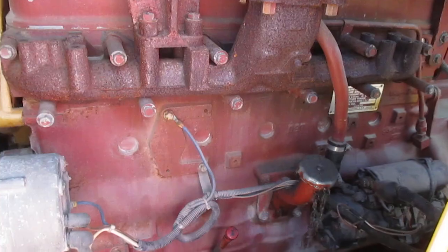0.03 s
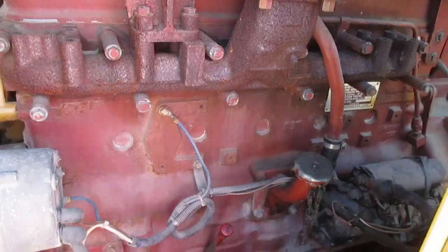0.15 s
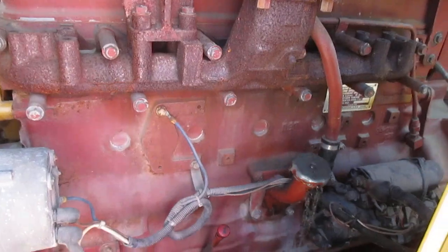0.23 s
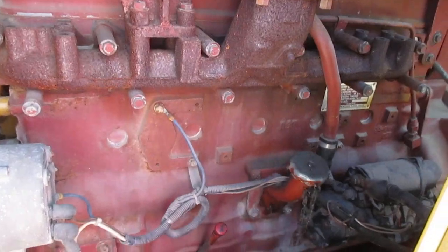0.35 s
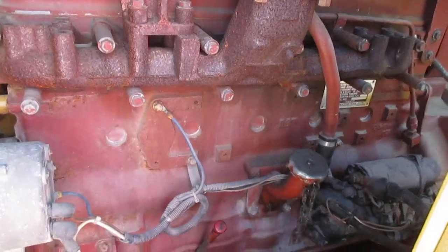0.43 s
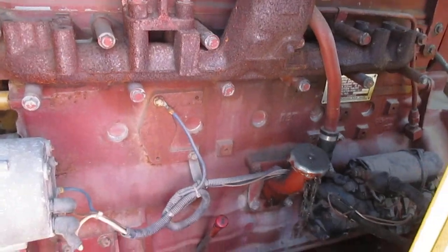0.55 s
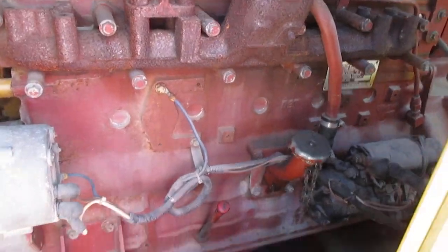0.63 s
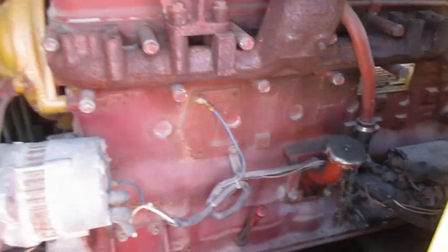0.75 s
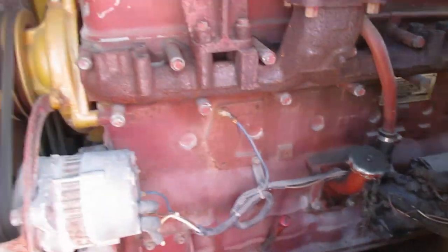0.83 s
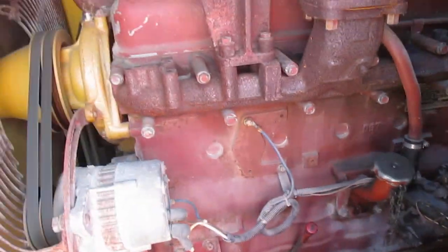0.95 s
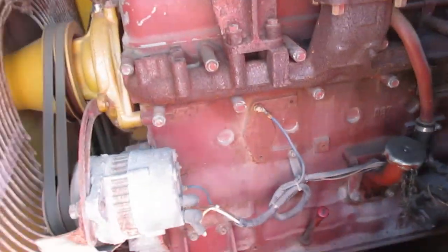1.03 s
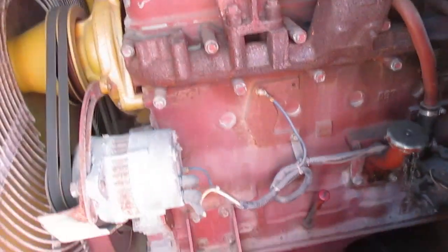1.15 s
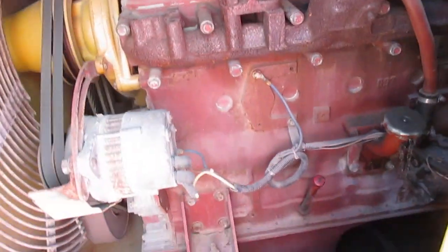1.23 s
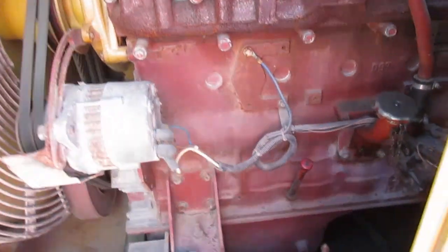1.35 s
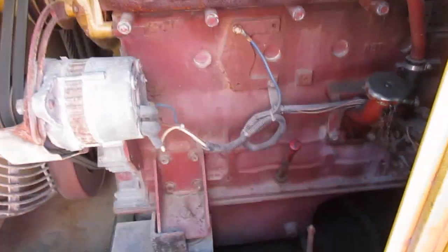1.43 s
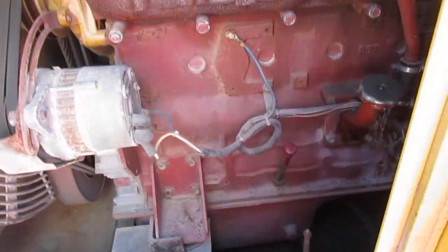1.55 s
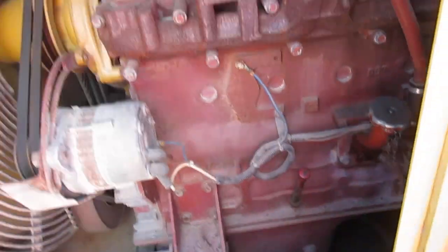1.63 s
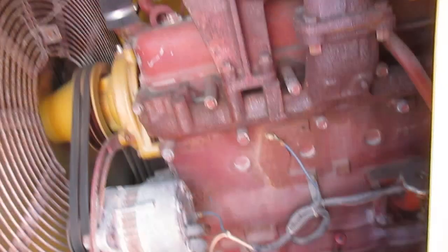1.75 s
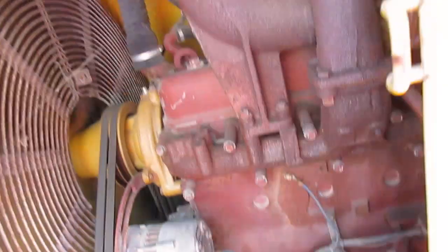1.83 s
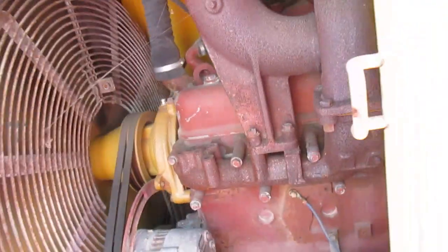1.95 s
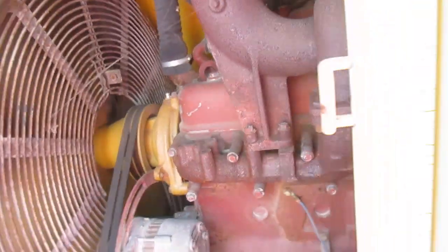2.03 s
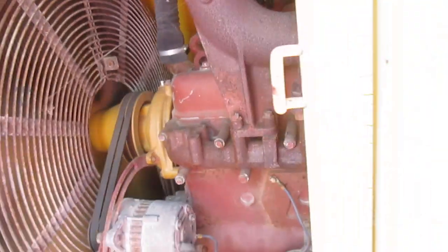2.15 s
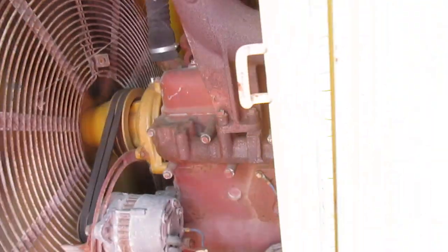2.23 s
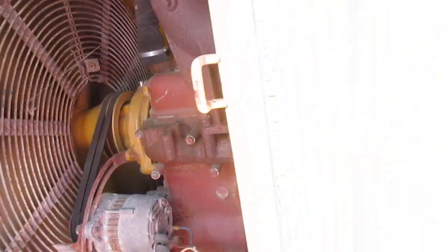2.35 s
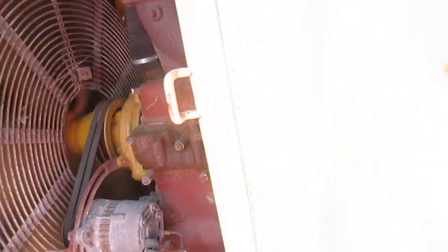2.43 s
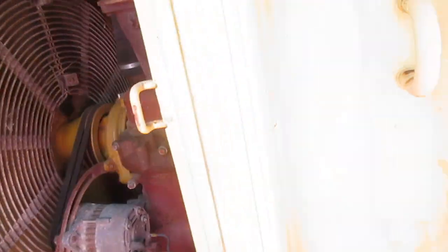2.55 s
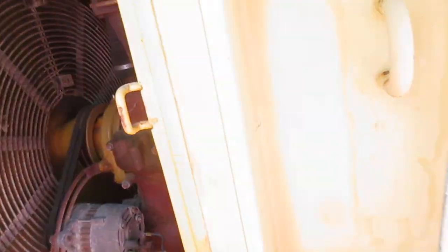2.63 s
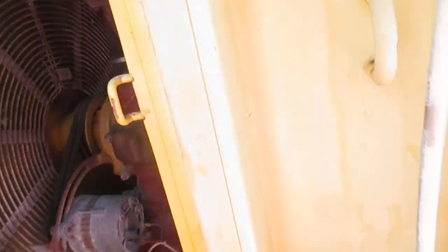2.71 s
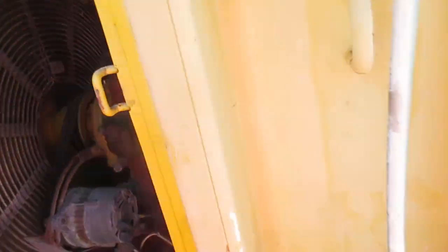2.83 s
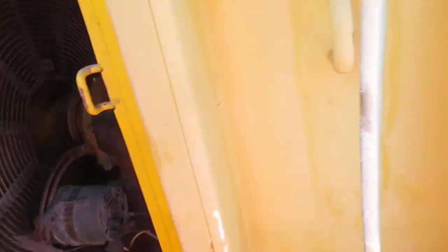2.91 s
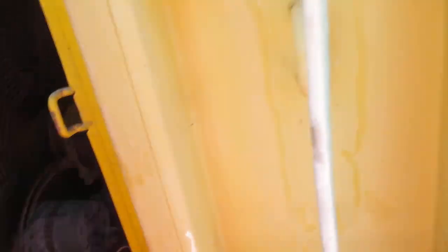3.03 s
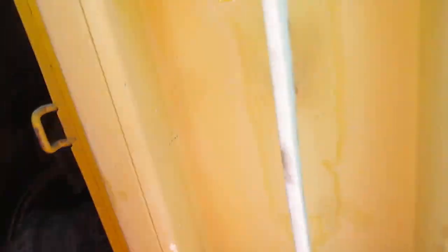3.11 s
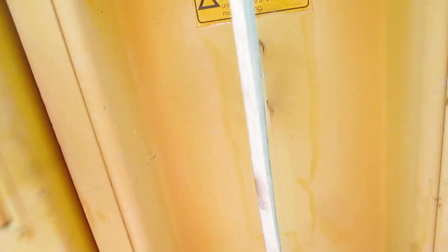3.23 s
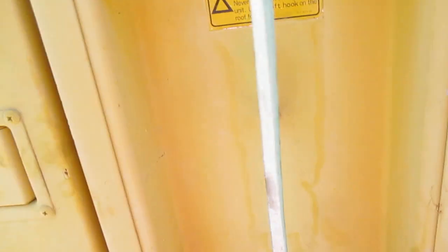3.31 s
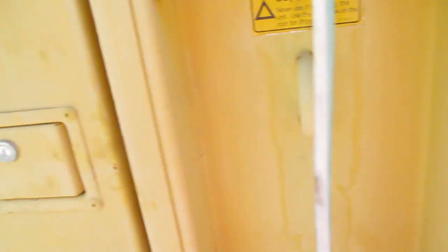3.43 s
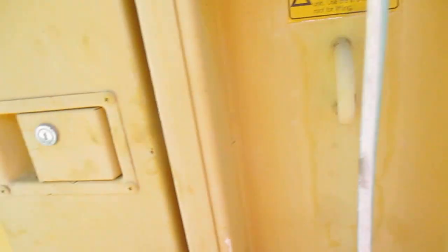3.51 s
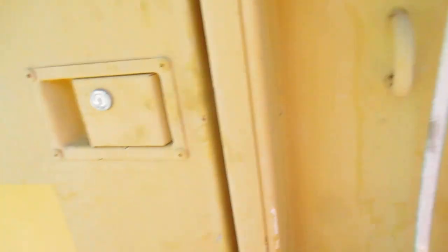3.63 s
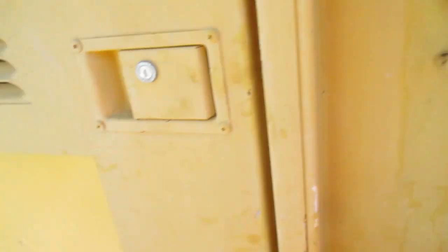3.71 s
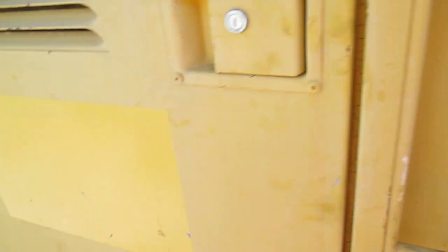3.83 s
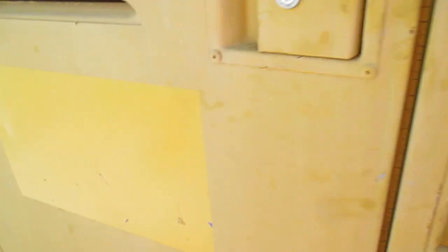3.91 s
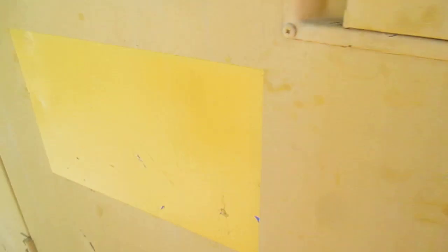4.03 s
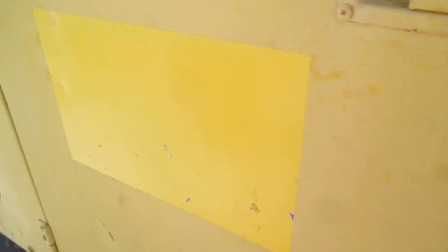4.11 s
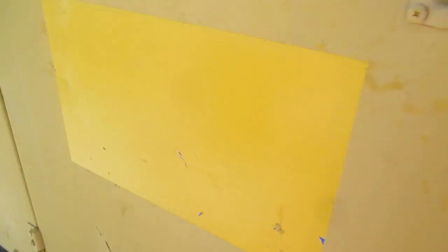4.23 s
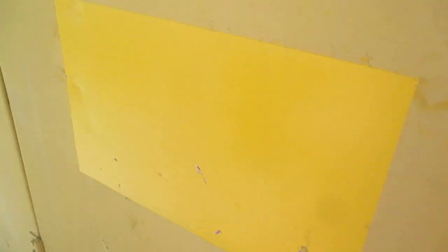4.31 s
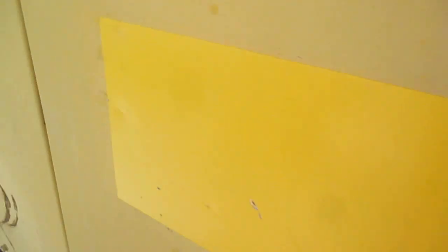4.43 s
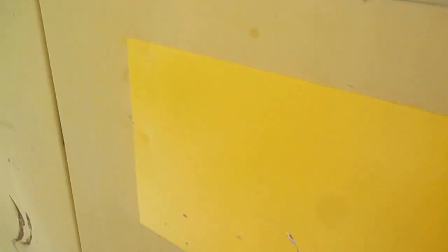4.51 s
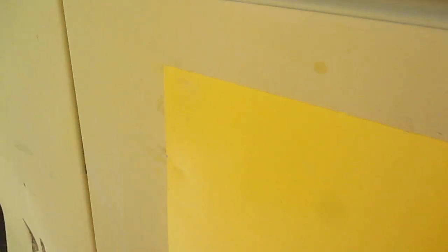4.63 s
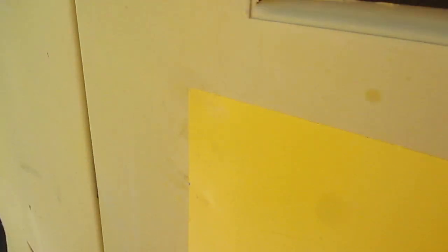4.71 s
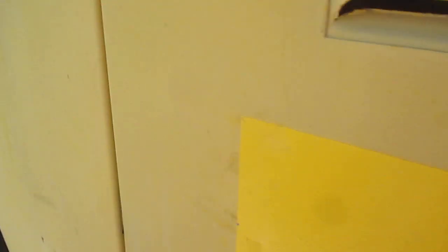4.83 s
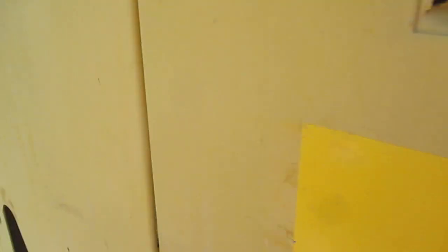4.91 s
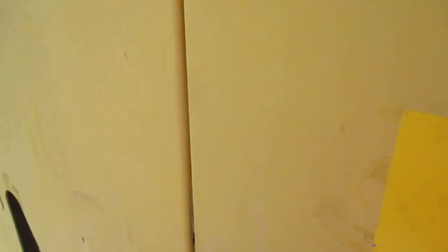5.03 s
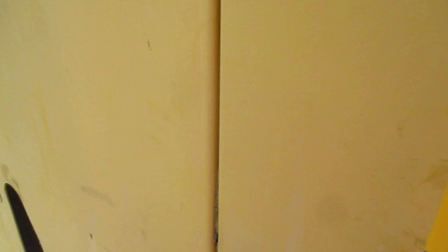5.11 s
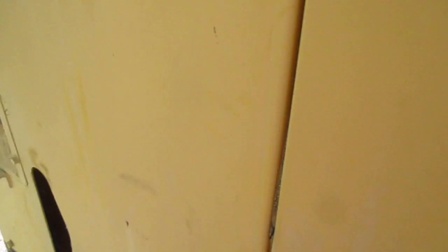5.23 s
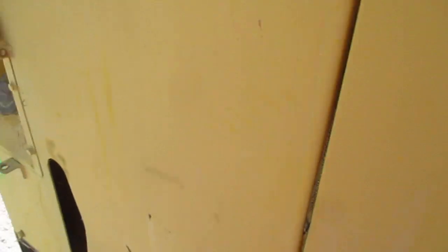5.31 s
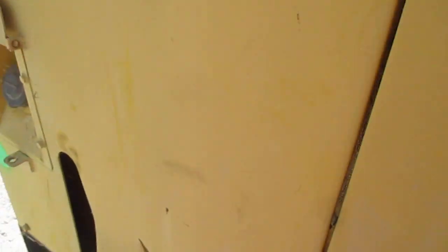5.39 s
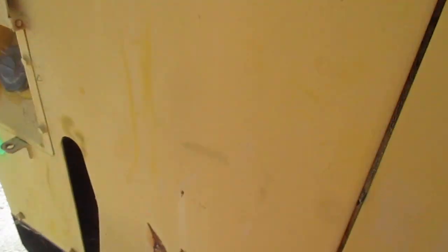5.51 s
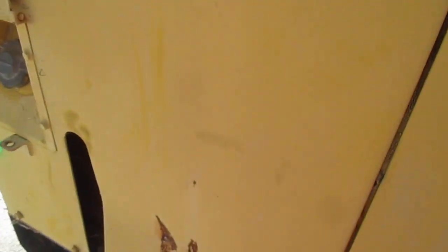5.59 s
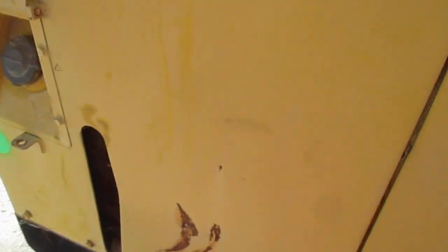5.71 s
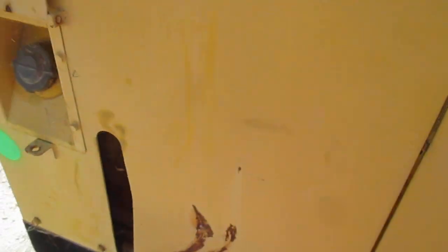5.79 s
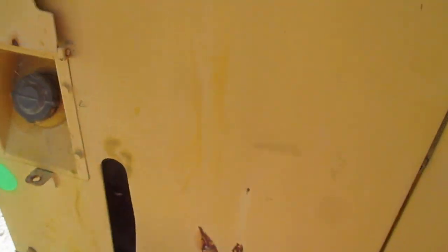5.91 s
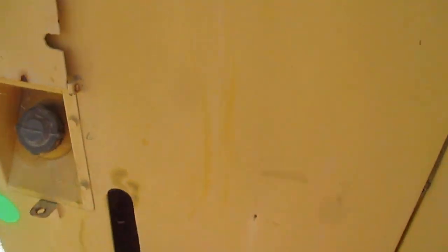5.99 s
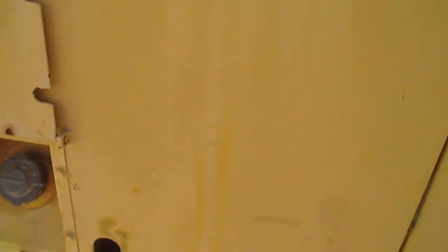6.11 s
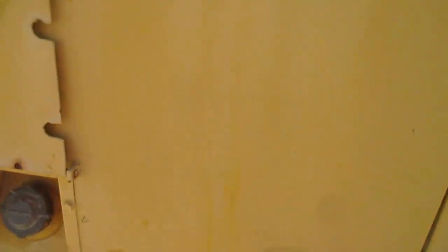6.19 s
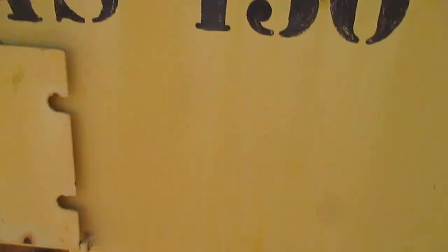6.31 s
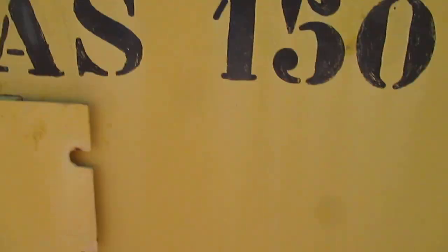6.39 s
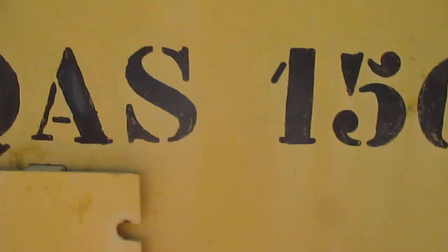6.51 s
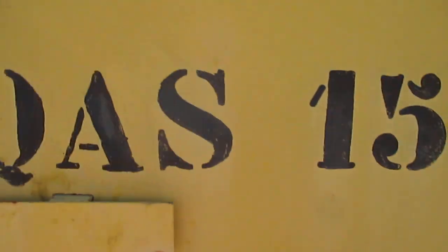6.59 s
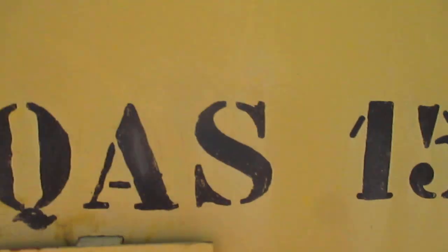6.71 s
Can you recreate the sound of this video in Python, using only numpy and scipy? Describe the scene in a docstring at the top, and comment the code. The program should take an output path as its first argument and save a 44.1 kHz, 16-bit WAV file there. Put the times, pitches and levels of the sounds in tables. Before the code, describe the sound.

Close to an open housing, a six-cylinder diesel engine runs steadily with rough throbbing, clatter and fan hum. The metal door is bumped, then swings shut with a bang and rattling latch. The engine instantly turns muffled, and its low drone swells again as the microphone moves along the housing outdoors, with faint trills nearby.

```python
"""First heard is the steady throb of a six-cylinder diesel generator and its fan, at the open housing door.
Firing-modulated noise, filtered by block and door, makes the engine; harmonic series make exhaust and fan.
The air gap rings as narrow noise. The nudged door swings to, bangs and chatters: noise cracks and dying modes.
Muffled engine and fan then grow again, bass first, as the microphone moves along the housing.
A squeak of the hinge and faint trills nearby are narrow-band noise."""
import sys
import numpy as np
from scipy import signal
from scipy.fft import rfft, irfft
from scipy.io import wavfile
from scipy.ndimage import uniform_filter1d

SR = 44100
rng = np.random.default_rng(int(sys.argv[2]) if len(sys.argv) > 2 else 0)


def dump(signal):
    """Clip the signal to [-1, 1] and save it as 16-bit WAV at the path in sys.argv[1]."""
    limited = np.clip(np.atleast_2d(signal).T, -1, 1)
    pcm = np.round(limited * 32767).astype(np.int16)
    wavfile.write(sys.argv[1], SR, pcm)


N = 297675
T = np.arange(N) / SR  # time/s

CYCLE_SAMPLES = 4012  # two crank turns, six firings
FIRST_FIRING_S = .0908
EXHAUST_START_RAD, FAN_START_RAD = -1.35, -.38
VALVE_HZ, VALVE_WIDTH_HZ, VALVE_T60_S = 9580, 1050, 0.11
VALVE_OVER_FIZZ_DB = 3.5  # peak of the tick over the top noise layer, door open
WAVER_DB_PER_MULTIPLE = .1  # rms wavering of a tone, times its multiple
CRACK_T60_S, SHORTER_S_PER_DB = .075, .0004  # weaker cracks die sooner
LATCH_OVER_CRACK_DB = -16.5  # for single blows
RUN_JITTER_S, RUN_SPREAD_DB = .002, 4  # greatest deviation either way
TRILL_PER_S = 48
BAND_LIMIT_HZ = 15780

# What reaches the microphone as it moves and the door shuts:
# [t/s, bass level/dB, body level/dB, treble level/dB]
HEARD = [(0.0, -1, 1.5, 0.5), (0.7, 0, 0.4, 1.2), (1.14, 1.5, 0, 0.7), (1.35, 0.5, -1.5, -1.6),
         (1.65, 0, -0.4, 1), (2.0, -0.5, -0.5, -1.5), (2.63, 0, -1, -3), (2.97, 0.7, -4, -4.5),
         (3.21, -1, -8, -9.5), (3.44, -8, -12, -13.5), (3.61, -9.5, -17, -21), (3.91, -9.5, -17, -21.5),
         (4.63, -6, -12.5, -19), (4.92, -3.5, -10, -19), (5.36, -1.5, -9.5, -20), (6.13, 3.5, -8, -19),
         (6.75, 7.5, -4.5, -16.5)]
# Narrowing of the door gap, which lifts or lowers layers: [t/s, share 0-1]
GAP_NARROWING = [(1.3, 0), (2.4, .5), (2.95, .95), (3.2, 1), (3.34, 0)]
# Change from the open-door to the shut-door spectrum: (start t/s, end t/s)
SHUTTING_S = (2.97, 3.196)

# Engine noise bands: [low f/Hz, high f/Hz, power share repeating each cycle, throb depth/dB]
NOISE_BANDS = [(20, 113, 0.19, -5), (150.5, 275, 0.25, 0.5), (377, 1310, 0.66, 1), (1490, 2790, 0.38, 2.5),
               (3420, 6680, 0.28, 2), (8540, 13700, .08, 4.5)]
# The same bands as rumble, growl, roar, clatter, hiss, fizz:
# [level/dB, share of bass level, of body level, of treble level, lift/dB by the narrowing gap]
NOISE_LEVELS = [(-32, .8, 0, 0, -4), (-27.5, 0.42, .05, 0.0055, 2.5), (-19.2, 0, 1.06, 0, -2.6),
                (-25, 0, 0.48, 0.49, 1.6), (-33, 0.056, 0, 1, 0.5), (-41.5, 0, 0.053, 1.17, 1)]
# Loud and dead spots of the noise: [band counted from 0, t/s, half-width/s, level/dB]
NOISE_SPOTS = [(0, 1.3, .3, 1.5), (1, 1.9, .35, -3), (1, 6.2, .6, -2.2), (4, 4.6, .45, -1.8),
               (5, 4.8, .35, 1.5), (5, 6.3, .5, -1.5)]
# Strength of the six firings in order: [relative; a quarter of it is added to the throb]
FIRING_STRENGTHS = [2.1, 0.56, 3.8, 1.6, 2.5, 2.7]
# Engine spectra with the door open and shut: [f/Hz, level per Hz/dB]
OPEN_SPECTRUM = [(20, -13), (60, -4), (110, 5), (170, -0.5), (250, -6.5), (420, 0), (668, -3), (1310, -7),
                 (1500, -13.5), (3050, -17), (3500, -23), (6500, -33), (11000, -43.5), (15600, -50)]
SHUT_SPECTRUM = [(20, -19), (50, -15), (82, -10.5), (120, -2), (260, 0), (480, -8.5), (620, -15),
                 (1250, -21), (1580, -30.5), (2900, -37.5), (3550, -45.5), (6500, -54.5), (11000, -64),
                 (15600, -70)]
# Resonances of block and housing: [f/Hz, width/Hz, peak lift open/dB, peak lift shut/dB]
BLOCK_RESONANCES = [(156.8, 3.5, -2.5, 10.5), (464, 16, 0, 1), (504, 12, 4, 0.5), (578, 9.7, 5, 0.5),
                    (665.6, 17, 8.5, -5.5), (784, 12, 4, 4), (1159, 12, 4.5, 10), (1948, 19, 6.5, 10.5),
                    (2276, 43, 4, 1), (2870, 14, 8.5, 1)]

# Exhaust tones on the firing rate, fan tones on the blade rate:
# [multiple, level/dB, share of bass level, of body level, of treble level, lift/dB by the narrowing gap]
EXHAUST_TONES = [(1, -25, 0.95, 0, 0, 0.5), (2, -27, 0.087, 0.86, 0, 3), (3, -31, 0.026, .6, 0, 7),
                 (4, -41, 0, 0.035, 0, 12)]
FAN_TONES = [(1, -27, 0.93, 0, 0, -4), (2, -24, 0.28, 0.58, 0.041, 7.5), (3, -38, 0.024, .5, 0, 19.5),
             (4, -30.5, 0, 1.55, 0.043, 8), (10, -32.5, 0, 0.98, 0.045, 6.5), (20, -39, 0.08, 0.02, .95, 6)]
# Loud and dead spots the microphone passes: [multiple, t/s, half-width/s, level/dB]
EXHAUST_SPOTS = [(2, .8, .5, 2.5), (2, 3.5, .3, -5), (2, 5.7, .75, 8), (3, 3.45, .2, -6), (3, 5.2, 1.1, 7),
                 (3, 6.2, .25, -5), (3, 6.75, .12, 5), (4, 1.2, .4, -14), (4, 5.6, 1.3, 4)]
FAN_SPOTS = [(1, 1.6, 1.2, -20), (1, 3.8, .3, 3), (1, 4.55, .65, 7), (1, 6.0, .35, -4), (2, .3, 0.46, -3),
             (2, 2.2, .2, -7), (2, 3.55, .35, -6), (2, 4.7, .4, 3), (2, 5.65, .45, -15), (3, 0.0, .45, -8),
             (3, 3.7, .3, 5), (3, 5.0, .2, 10.5), (3, 5.9, 0.84, -8), (4, 2.3, .35, -5), (4, 4.3, .45, -10),
             (4, 2.85, .15, -14), (4, 5.55, .5, 10), (10, 2.0, .4, -5), (10, 5.0, .15, -15),
             (10, 6.3, .4, -4), (20, 1.5, 0.21, 7.5), (20, 1.95, .2, -5), (20, 4.85, .5, 10.5)]
# Blade rate of the fan, whose belt slips a little for a moment: [t/s, f/Hz]
FAN_RATE = [(0, 96.75), (1.4, 96.75), (1.85, 96.45), (2.3, 96.75), (6.75, 96.74)]
# Ringing of the air gap until the door is to: [t/s, f/Hz, level/dB]
GAP_RING = [(1.5, 640, -33), (1.8, 640, -23), (2.1, 688.5, -21.5), (2.4, 690.4, -26.5), (2.7, 677.6, -24),
            (3.1, 669, -28), (3.3, 673, -35)]

# Single blows of the door: [t/s, crack envelope level/dB, edge ring level/dB before roughening]
SINGLE_BLOWS = [(1.0934, -11, -33), (3.2624, -10.5, -27), (3.2758, -14.5, -21.5), (3.279, -10.5, -18),
                (3.2854, -27, -21), (3.2974, -21, -30), (3.3094, -24, -34), (3.322, -21, -25),
                (3.33, -18, -21.5), (3.345, -24, -33), (3.3543, -31, -36), (3.373, -44, -36),
                (3.4144, -42, -49), (3.454, -34, -44), (3.4824, -31, -45), (3.615, -44, -50),
                (3.6374, -37, -51), (3.6681, -38, -49)]
# Runs of blows as the door rebounds and the latch rattles out: [first t/s, last t/s, spacing/s,
# first crack level/dB, loss per blow/dB, edge ring over crack/dB, latch ring over crack/dB]
BLOW_RUNS = [(3.3885, 3.65, .051, -26.5, 1.6, -12, -14), (3.7054, 3.92, .0305, -44, 0, -5, -9)]
# Spectrum of a crack: [f/Hz, level per Hz/dB]
CRACK_SPECTRUM = [(250, -19), (500, -11.5), (1000, -4.5), (2200, -7), (3200, -15), (6000, -17),
                  (9000, -19.5), (12500, -27.5), (15600, -40)]
# Thumps of the door on the housing: [t/s, boom level/dB, drum level/dB]
THUMPS = [(1.097, -10.5, -34), (1.125, -12, -39), (1.159, -15, -30), (1.216, -21, -34), (1.28, -21.5, -36),
          (3.27, -25, -15), (3.287, -14.5, -18), (3.31, -33, -13), (3.328, -17.5, -22), (3.348, -34, -13.5),
          (3.39, -28, -14), (3.445, -22, -23), (3.541, -30, -27), (3.58, -35, -24)]
# Modes of door edge, latch, door panel and booming housing: [f/Hz, relative level/dB, t60/s]
EDGE_MODES = [(780, -8, .1), (960, -6, .1), (1120, -4, .1), (1335, 0, .11), (1440, -4, .1), (1700, -7, .1),
              (2080, -2.5, .12), (2230, -5, .1), (2480, -6, .1)]
LATCH_MODES = [(3130, 5.5, 0.11), (3600, -2.5, .1), (4700, 2, 0.13), (6000, -1, .08), (6040, -3, .09),
               (7240, -7, .12), (7450, -17, 0.074), (9200, -11, .1), (9300, -7, .1)]
PANEL_MODES = [(185, -4, .2), (268, 0, .2), (300, -2.5, .2), (335, -3, .18), (480, -8, .15), (690, -9, .15)]
HOUSING_MODES = [(47, -6, 0.55), (58.4, -4, .5), (75, 2, 0.25), (94, -3, .15), (150.2, 0, 0.37)]
# Faint squeaks of the hinge: [start t/s, end t/s, start f/Hz, end f/Hz, level/dB]
SQUEAKS = [(3.07, 3.152, 10900, 11800, -50), (3.2, 3.235, 12000, 12200, -66)]
# Faint trills nearby: [start t/s, end t/s, f/Hz, level/dB before pulsing]
TRILLS = [(4.21, 4.33, 4130, -62), (4.56, 4.62, 4150, -65), (4.85, 4.95, 3850, -60),
          (4.99, 5.08, 4050, -61), (5.14, 5.17, 4200, -61), (5.387, 5.46, 4150, -57),
          (5.54, 5.71, 4170, -54), (5.74, 5.81, 4130, -59), (6.21, 6.35, 4130, -59), (6.4, 6.45, 4120, -59),
          (6.66, 6.7, 4150, -60)]
# Brief dips of the treble: [t/s, length/s, level/dB]
TREBLE_DIPS = [(1.122, .003, -8), (1.166, .003, -18), (3.2955, .006, -22), (3.339, .004, -10)]


def gain_of(db):
    """Amplitude ratio from a level: twenty decibels per factor of ten."""
    return 10 ** (np.asarray(db) / 20)


def evened(x):
    """Normalization to a root-mean-square value of 1."""
    return x / np.sqrt(np.mean(x ** 2) + 1e-20)


def columns(rows):
    """Linear interpolation of each column against the time in the first."""
    times, *values = np.transpose(rows)
    return [np.interp(T, times, value) for value in values]


def read(points, hz):
    """Interpolation of a spectrum on a logarithmic frequency axis."""
    f, value = np.transpose(points)
    return np.interp(np.log(hz + 1), np.log(f + 1), value)


def shaped(x, gain):
    """Linear filtering: each spectral bin is multiplied by its gain, then the whole is set to rms 1."""
    return evened(irfft(rfft(x) * gain, N))


def wobble(size):
    """Random fluctuation of rms 1: white noise under two moving averages of size samples."""
    once = uniform_filter1d(rng.standard_normal(N), size)
    return evened(uniform_filter1d(once, size))


def fuzzy(hz, width):
    """Narrow-band noise: complex low-passed noise shifted onto a carrier that follows hz."""
    radius = np.exp(-np.pi * width / SR)
    white = rng.standard_normal(N) + 1j * rng.standard_normal(N)
    slow = signal.lfilter([1], [1, -2 * radius, radius * radius], white)
    phase = 2 * np.pi * np.cumsum(hz * np.ones(N)) / SR
    return evened((slow * np.exp(1j * phase)).real)


def controls():
    """Transmission by position and aperture: three heard levels and the narrowing of the gap."""
    return np.array(columns(HEARD) + columns(GAP_NARROWING))


def level(law, spots, which, control):
    """Superposition in dB: own level, weighted controls and Gaussian loud or dead spots."""
    spot_db = sum(db * np.exp(-((T - s) / half) ** 2)
                  for target, s, half, db in spots if round(target) == which)
    return law[0] + np.dot(law[1:], control) + spot_db


def repeating(memory):
    """Cyclic correlation: each cycle of noise keeps most of the cycle before it."""
    fresh = rng.standard_normal((N // CYCLE_SAMPLES + 21, CYCLE_SAMPLES))
    cycles = signal.lfilter([1], [1, -memory], fresh, axis=0)
    return evened(cycles[20:].ravel()[:N])  # the first cycles settle the memory


def engine_colours(hz):
    """Resonance: Lorentzian peaks of block and housing lift the open and shut spectra."""
    def lift(column):
        return sum(row[column] / (1 + (2 * (hz - row[0]) / row[1]) ** 2) for row in BLOCK_RESONANCES)
    return gain_of(read(OPEN_SPECTRUM, hz) + lift(2)), gain_of(read(SHUT_SPECTRUM, hz) + lift(3))


def valve(firings, fizz_db, shut):
    """Exponential decay: one valve tick per cycle, a noise resonance restarted at the fourth firing."""
    since_s = (firings - 3) % 6 * CYCLE_SAMPLES / 6 / SR
    db = fizz_db + VALVE_OVER_FIZZ_DB + 2.0 * np.sin(shut) - 60 * since_s / VALVE_T60_S
    return gain_of(db) * fuzzy(VALVE_HZ, VALVE_WIDTH_HZ)


def engine():
    """Amplitude modulation: firings throb repeating and fresh noise, coloured by block and door."""
    hz = np.fft.rfftfreq(N, 1 / SR)
    open_colour, shut_colour = engine_colours(hz)
    shut = np.interp(T, SHUTTING_S, (0, np.pi / 2))  # angle of an equal-power crossfade
    firings = (T - FIRST_FIRING_S) * SR / CYCLE_SAMPLES * 6
    strength = np.array(FIRING_STRENGTHS)[np.floor(firings).astype(int) % 6] / 4
    throb = uniform_filter1d(.5 - firings % 1 + strength, size=30)  # jumps at each firing, then sinks
    same, fresh = repeating(memory=0.891), rng.standard_normal(N)
    control = controls()
    levels = [level(law, NOISE_SPOTS, k, control) for k, law in enumerate(NOISE_LEVELS)]
    out = np.zeros(N)
    for (low_hz, high_hz, share, throb_db), db in zip(NOISE_BANDS, levels):
        uneven_db = 1.08 * wobble(size=300) + 0.76 * wobble(size=4000)  # no two firings burn alike
        noise = np.sqrt(share) * same + np.sqrt(1 - share) * fresh
        drive = gain_of(throb_db * throb + uneven_db) * noise
        band = 1 / np.sqrt((1 + (low_hz / (hz + 1)) ** 12) * (1 + (hz / high_hz) ** 12))
        through_open = np.cos(shut) * shaped(drive, band * open_colour)
        through_shut = np.sin(shut) * shaped(drive, band * shut_colour)
        out += gain_of(db) * (through_open + through_shut)
    return out + valve(firings, levels[-1], shut)


def tones(rows, spots, hz, start_rad):
    """Harmonic series: multiples of one rotation swell and fade at loud and dead spots."""
    angle = 2 * np.pi * np.cumsum(hz * np.ones(N)) / SR + start_rad
    control, out = controls(), np.zeros(N)
    for multiple, *law in rows:
        waver_db = multiple * WAVER_DB_PER_MULTIPLE * wobble(size=3000)
        db = level(law, spots, round(multiple), control) + waver_db
        out += np.sqrt(2) * gain_of(db) * np.cos(round(multiple) * angle)
    return out


def exhaust():
    """Periodic pulsation: tones on multiples of the firing rate, six firings per cycle."""
    return tones(EXHAUST_TONES, EXHAUST_SPOTS, 6 * SR / CYCLE_SAMPLES, EXHAUST_START_RAD)


def fan():
    """Blade-passing tones: multiples of a blade rate that sags slightly as the belt slips."""
    return tones(FAN_TONES, FAN_SPOTS, columns(FAN_RATE)[0], FAN_START_RAD)


def door_gap():
    """Cavity resonance: the air gap sounds as narrow noise of moving pitch until the door is to."""
    gap_hz, gap_db = columns(GAP_RING)
    return gain_of(gap_db) * (T < GAP_RING[-1][0]) * fuzzy(gap_hz, width=138)


def add(mix, s, sound):
    """Superposition: a sound is added into the mix from time s, cut at the end."""
    part = mix[round(s * SR):][:len(sound)]
    part += sound[:len(part)]


def ring(modes, t, chance, uneven_db):
    """Modal decay: damped sines whose pitch and level vary a little with each stroke."""
    out = np.zeros(len(t))
    for (hz, db, t60), c in zip(modes, chance):
        struck_hz = hz * (1 + 0.033 * (c - .5))
        decay_db = db + uneven_db * (c - 1.0) - 60 * t / t60
        out += gain_of(decay_db) * np.sin(2 * np.pi * struck_hz * t)
    return out


def blows():
    """Repeated impact: single blows, then runs with random timing and strength."""
    rows = [(s, db, edge_db, db + LATCH_OVER_CRACK_DB) for s, db, edge_db in SINGLE_BLOWS]
    for first, last, spacing, db, loss_db, edge_db, latch_db in BLOW_RUNS:
        luck = rng.uniform(-1, 1, (12, 2))
        for k, s in enumerate(np.arange(first, last, spacing)[:len(luck)]):
            crack_db = db - k * loss_db + RUN_SPREAD_DB * luck[k, 0]
            time_s = s + RUN_JITTER_S * luck[k, 1]
            rows.append((time_s, crack_db, crack_db + edge_db, crack_db + latch_db))
    return rows


def door():
    """Impact excitation: blows crack and ring edge and latch; thumps drum the panel and boom the housing."""
    hz = np.fft.rfftfreq(N, 1 / SR)
    crack = shaped(rng.standard_normal(N), gain_of(read(CRACK_SPECTRUM, hz)))
    crack_envelope, edge, bodies = np.zeros(N), np.zeros(N), np.zeros(N)
    t = T[:SR // 2]
    for s, db, edge_db, latch_db in blows():
        chance = rng.random(len(LATCH_MODES))
        t60 = max(CRACK_T60_S + SHORTER_S_PER_DB * db, .01)
        add(crack_envelope, s, gain_of(db - 60 * t / t60) * np.minimum(t / 0.0011, 1))
        add(edge, s, gain_of(edge_db) * ring(EDGE_MODES, t, chance, uneven_db=2))
        add(bodies, s, gain_of(latch_db) * ring(LATCH_MODES, t, chance[::-1], uneven_db=14))
    for s, boom_db, drum_db in THUMPS:
        chance = rng.random(len(PANEL_MODES))
        drum = ring(PANEL_MODES, t, chance, uneven_db=1.5) * np.minimum(t / 0.0049, 1)
        boom = ring(HOUSING_MODES, t, chance, uneven_db=3.0) * np.minimum(t / 0.0073, 1)
        add(bodies, s, gain_of(drum_db) * drum)
        add(bodies, s, gain_of(boom_db) * boom)
    buzz = .7 + .7 * wobble(size=120)  # loose sheet metal roughens the ring of the edge
    return bodies + edge * buzz + crack_envelope * crack


def bursts(rows, width):
    """Enveloped narrow-band noise: fuzzy tones swell, fade and glide from pitch to pitch."""
    out = np.zeros(N)
    for start, end, start_hz, end_hz, db in rows:
        progress = np.clip((T - start) / (end - start), 0, 1)
        swell = np.sqrt(np.sin(np.pi * progress).clip(0))
        glide_hz = np.interp(T, (start, end), (start_hz, end_hz))
        out += gain_of(db) * swell * fuzzy(glide_hz, width)
    return out


def hinge():
    """Friction squeak, modelled as narrow-band noise with rising pitch."""
    return bursts(SQUEAKS, width=150)


def trills():
    """Amplitude modulation: a cosine makes quick pulses of a narrow tone."""
    pulses = 1 + 0.65 * np.cos(2 * np.pi * TRILL_PER_S * T)
    steady = [(start, end, hz, hz, db) for start, end, hz, db in TRILLS]
    return pulses * bursts(steady, width=60)


def scene():
    """Linear superposition of all sources in one channel."""
    return (engine() + exhaust() + fan() + door_gap() + door() + hinge() + trills())[None]


def record(dry):
    """Filtering and saturation: brief treble dips, soft limit, short end fade, then band limit."""
    low = signal.sosfiltfilt(signal.butter(2, 500, fs=SR, output="sos"), dry)
    dip_db = sum(db * np.exp(-(2 * (T - s) / length) ** 4) for s, length, db in TREBLE_DIPS)
    dipped = low + gain_of(dip_db) * (dry - low)
    limited = 1.1 * np.tanh(dipped / 1.1)
    faded = limited * np.minimum((T[-1] - T) / .003, 1)
    padded = np.pad(faded, ((0, 0), (511, 511)), "reflect")
    low_pass = signal.firwin(1023, BAND_LIMIT_HZ, window=("kaiser", 9), fs=SR)
    return signal.oaconvolve(padded, low_pass[None], "valid")


dry = scene()
out = record(dry)
dump(out)
```